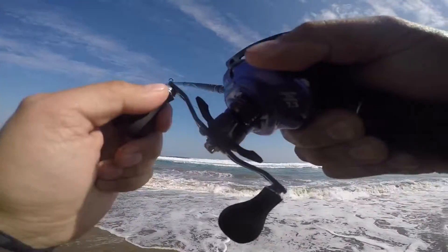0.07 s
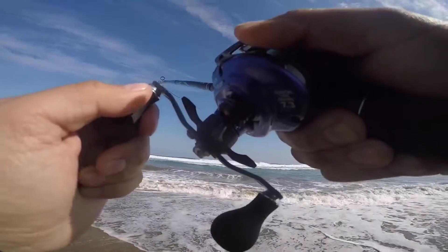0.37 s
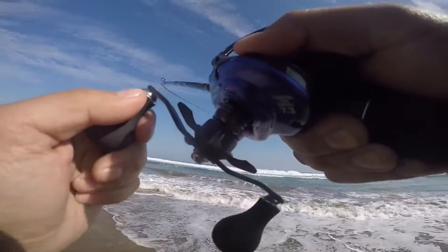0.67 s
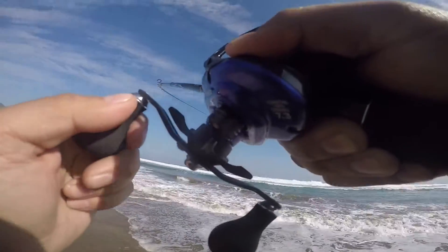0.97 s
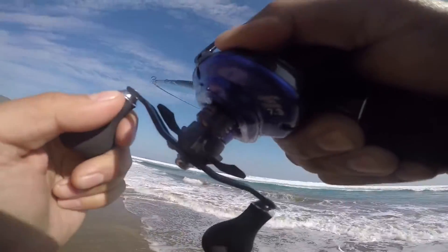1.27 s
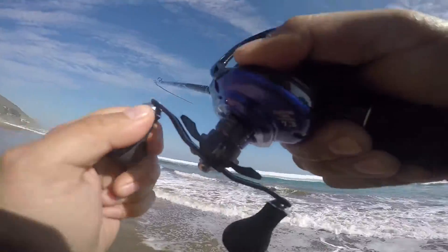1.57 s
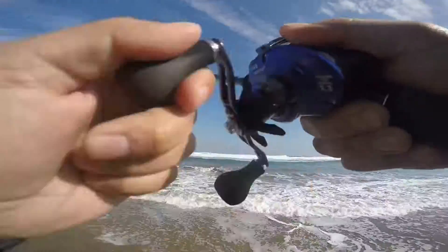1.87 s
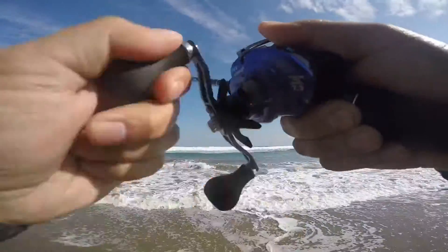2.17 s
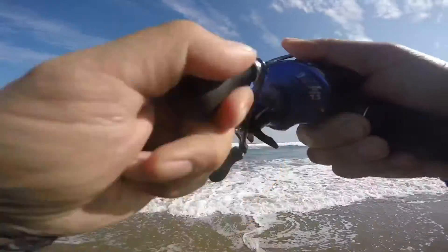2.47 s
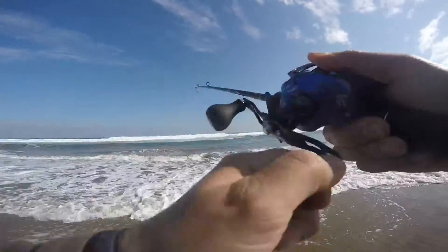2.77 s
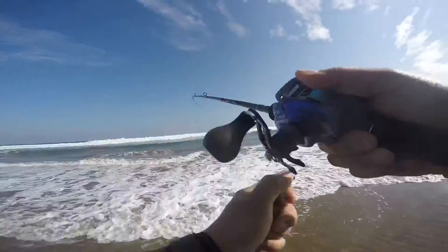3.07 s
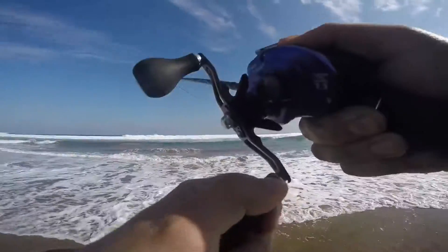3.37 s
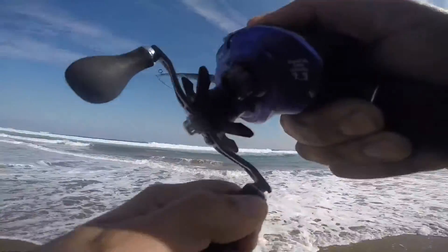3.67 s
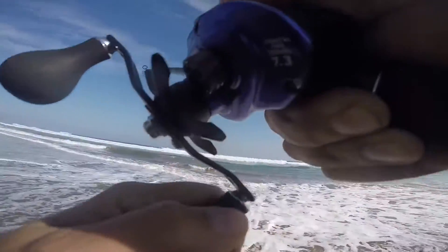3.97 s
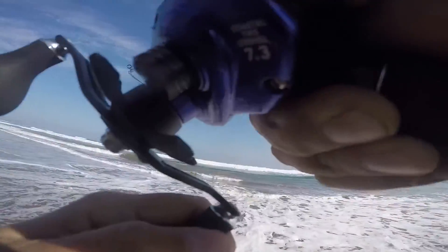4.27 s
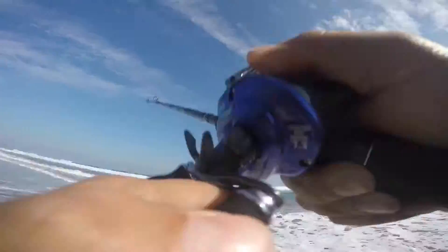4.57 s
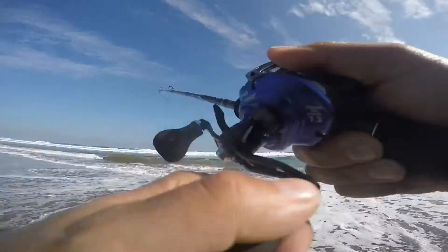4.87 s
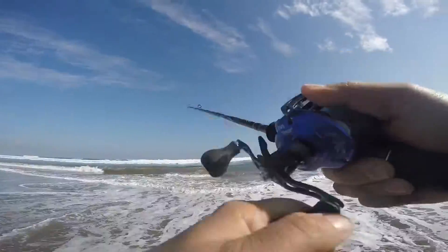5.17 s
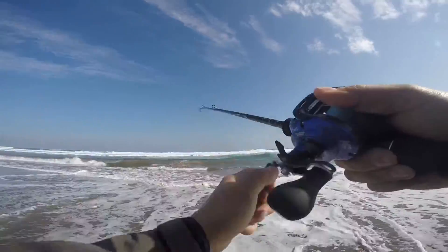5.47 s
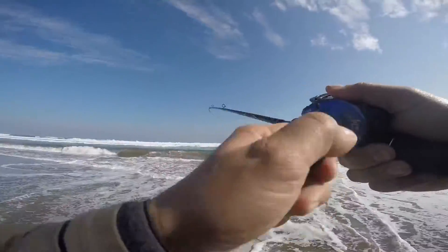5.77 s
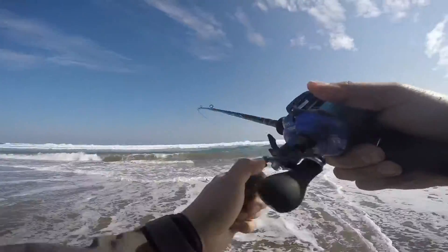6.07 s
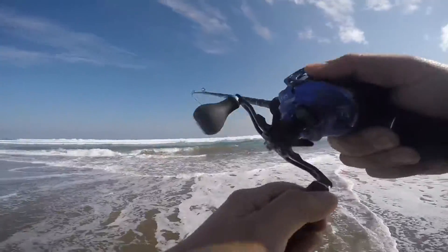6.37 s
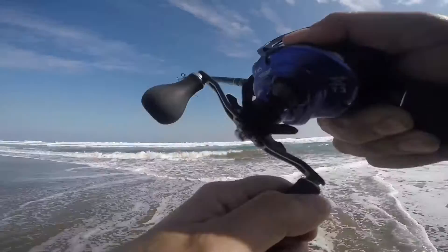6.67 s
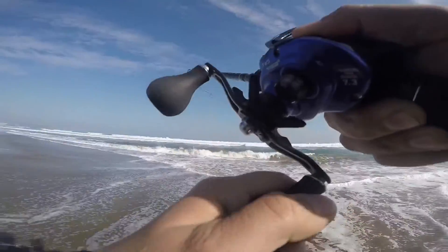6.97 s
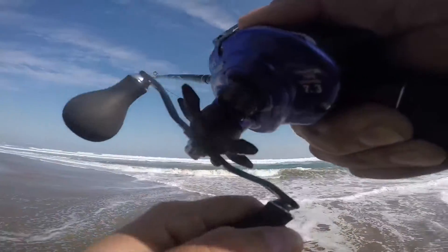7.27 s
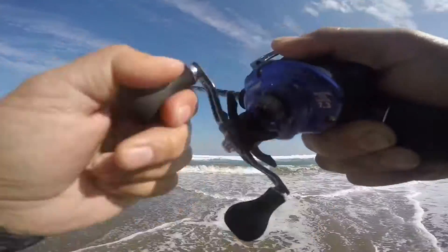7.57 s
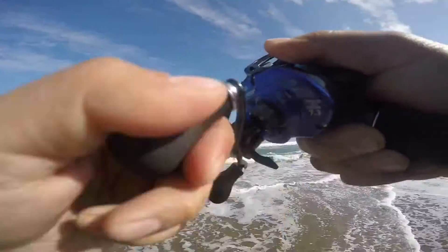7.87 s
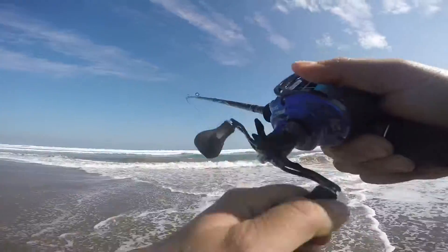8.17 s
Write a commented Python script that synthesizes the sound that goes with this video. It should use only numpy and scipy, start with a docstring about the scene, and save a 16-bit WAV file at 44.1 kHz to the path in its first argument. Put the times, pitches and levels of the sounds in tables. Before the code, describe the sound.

Surf washes over a sandy beach with wind rumbling on the microphone, and a fishing reel snaps into gear with one loud click.

```python
"""A sandy beach: surf washes in while an angler works a fishing reel just in front of a body-worn camera.
Gusts and soft bumps, probably footsteps, rumble in the camera case; something like a sleeve rubs and
ticks against it. Midway the reel snaps into gear: clutch and gears click, and a jolt runs down the rod.
The jolt overloads the microphone, and the limiter ducks the surf for a moment."""
import sys
import numpy as np
from scipy import signal
from scipy.fft import rfft, irfft
from scipy.io import wavfile
from scipy.ndimage import uniform_filter1d, minimum_filter1d

SR = 44100
rng = np.random.default_rng(int(sys.argv[2]) if len(sys.argv) > 2 else 0)


def digitize_waveform(pressure):
    """Quantize a signal to 16-bit integers and store it at the path in sys.argv[1].

    Rows of a 2-D input are taken as channels; values are limited to [-1, 1].
    """
    field = np.atleast_2d(pressure).T
    bounded = np.clip(field, -1, 1)
    quanta = np.round(bounded * 32767).astype(np.int16)
    wavfile.write(sys.argv[1], SR, quanta)


N = 362502
TIME = np.arange(N) / SR


def amp(db):
    """Decibels to gain."""
    return 10 ** (np.asarray(db) / 20)


def unit_rms(x):
    """Scales to rms 1."""
    return x / np.sqrt(np.mean(x ** 2) + 1e-20)


def drift(count, span):
    """Noise averaged over span points, rms 1."""
    return unit_rms(uniform_filter1d(rng.standard_normal(count), size=span))


def spectrum_db(spectrum, hz):
    """Interpolates a spectrum over log frequency."""
    f, db = np.transpose(spectrum)
    return np.interp(np.log(hz + 1), np.log(f), db)


def shaped(x, spectrum):
    """Filters by a spectrum, rms 1."""
    gain = amp(spectrum_db(spectrum, np.fft.rfftfreq(len(x), 1 / SR)))
    return unit_rms(irfft(rfft(x) * gain, len(x)))


def band(x, centre_hz, spread_oct):
    """Broad band-pass, rms 1."""
    octaves = np.log2((np.fft.rfftfreq(len(x), 1 / SR) + 1) / centre_hz)
    return unit_rms(irfft(rfft(x) / (1 + (octaves / spread_oct) ** 2), len(x)))


def low_pass(x, hz):
    """Steep band limit."""
    return signal.oaconvolve(x, signal.firwin(401, hz, window="blackman", fs=SR), "same")


def swell(peak_s, rise_s, fall_s):
    """Two-sided Gaussian hump, height 1."""
    return np.exp(-((TIME - peak_s) / np.where(TIME < peak_s, rise_s, fall_s)) ** 2)


def ring(modes, rise_s):
    """Modes that build up after a blow, then decay."""
    t = np.arange(SR // 3) / SR
    onset = (1 - np.exp(-t / rise_s)) ** 2
    return onset * sum(amp(db) * np.sin(2 * np.pi * hz * t) * 1000 ** (-t / t60) for hz, db, t60 in modes)


def snap(spectrum):
    """Minimum-phase click with this spectrum, peak 1."""
    log_gain = np.log(amp(spectrum_db(spectrum, abs(np.fft.fftfreq(SR // 3, 1 / SR)))))
    click = np.fft.ifft(np.exp(np.conj(signal.hilbert(log_gain)))).real
    return click / abs(click).max()


def add(mix, at_s, sound):
    """Mixes a sound in at at_s."""
    part = mix[max(round(at_s * SR), 0):][:len(sound)]
    part += sound[:len(part)]


def blows(rows, sound):
    """Plays one sound at each row's time and peak level."""
    out = np.zeros(N)
    for at_s, db in rows:
        add(out, at_s, amp(db) * sound / abs(sound).max())
    return out


# Case resonances for airborne sound: f/Hz, width/Hz, boost/dB
CASE_PEAKS = [(1092, 180, 3.5), (1760, 150, 5), (2550, 440, 2), (4043, 350, 8.5), (4970, 370, 5.5),
              (5930, 310, 6.5), (6900, 840, 4), (8330, 380, 3.5), (10380, 680, 4)]

def wash(spectrum, patchy_db, flicker_db):
    """Water noise with drifting patches and splashy flicker, heard through the case."""
    frames, hz = N // 256 + 5, np.fft.rfftfreq(1024, 1 / SR)
    real, imag, patches = rng.standard_normal((3, frames, len(hz)))
    patches = unit_rms(uniform_filter1d(uniform_filter1d(patches, size=14, axis=0), size=16, axis=1))
    flicker = drift(frames, 4)[:, None]
    case_db = sum(db / (1 + (2 * (hz - f) / width) ** 2) for f, width, db in CASE_PEAKS)
    gain = amp(spectrum_db(spectrum, hz) + case_db + patchy_db * patches + flicker_db * flicker)
    bins = (real + 1j * imag) * gain
    return unit_rms(signal.istft(bins.T, nperseg=1024, noverlap=768)[1][:N])


# Breaker and foam spectra: f/Hz, level/dB
ROAR_SPECTRUM = [(60, 0), (130, 0.5), (200, 0.5), (330, 0.5), (520, -3), (700, -8.5), (1000, -8),
                 (1500, -11), (2600, -10), (4200, -19), (5000, -36)]
FOAM_SPECTRUM = [(300, -22), (1000, 4.5), (1500, -0.5), (2000, -11), (3200, -3.5), (3650, -13), (4300, -13),
                 (4600, -12.5), (5500, -15.5), (7500, -14.5), (9200, -20), (11000, -21), (12500, -25),
                 (15000, -28)]
# Waves running up the sand: crest t/s, rise/s, fall/s, roar level/dB, foam level/dB
WAVE_SWELLS = [(.8, 1.8, 0.6, -53, -51.5), (2.45, 1.04, 0.59, -47, -49), (5.5, 0.21, 0.39, -50, -51),
               (6.35, 0.27, 0.55, -45, -50.5), (7.55, .6, 1.5, -44.5, -56)]

def surf(roar_floor_db=-47.5, foam_floor_db=-52.5, cutoff_hz=15300):
    """Each wave swells the roar of the breakers and the fizz of the foam."""
    roar_power, foam_power = amp(roar_floor_db) ** 2, amp(foam_floor_db) ** 2
    for crest_s, rise_s, fall_s, roar_db, foam_db in WAVE_SWELLS:
        wave = swell(crest_s, rise_s, fall_s)
        roar_power += amp(roar_db) ** 2 * wave
        foam_power += amp(foam_db) ** 2 * wave
    roar = np.sqrt(roar_power) * wash(ROAR_SPECTRUM, patchy_db=1.44, flicker_db=0.38)
    fizz = np.sqrt(foam_power) * wash(FOAM_SPECTRUM, patchy_db=0.9, flicker_db=1.3)
    return low_pass(roar + fizz, cutoff_hz)


# Wind rumble: f/Hz, level/dB
WIND_SPECTRUM = [(8, 1), (22, 3.5), (40, 0), (65, -2), (85, -6), (110, -19), (150, -20.5), (300, -43),
                 (700, -86)]
# Gusts: peak t/s, half-length/s, level/dB
WIND_GUSTS = [(1.89, 0.18, -26), (2.643, 0.47, -30), (3.11, 0.18, -31.5), (3.794, 0.031, -36.5),
              (4.5, 0.53, -36.5), (5.306, 0.23, -32), (5.757, 0.075, -30.5), (6.196, 0.1, -22.5),
              (6.677, 0.17, -30), (6.9, 0.083, -30), (7.276, .1, -29), (7.673, 0.057, -27),
              (8.02, 0.17, -27.5)]

def wind(breeze_db=-42, lumpy_db=2.5):
    """Eddies press on the case in uneven lumps; gusts ride on a steady breeze."""
    gust_power = sum(amp(db) ** 2 * swell(peak_s, half_s, half_s) for peak_s, half_s, db in WIND_GUSTS)
    strength = np.sqrt(amp(breeze_db) ** 2 + gust_power)
    lumps = amp(lumpy_db * drift(N, 3000))
    return strength * shaped(rng.standard_normal(N) * lumps, WIND_SPECTRUM)


# Camera mount modes: f/Hz, level/dB, t60/s
MOUNT_MODES = [(59.8, 7, 0.073), (28.4, -9, 0.18)]
# Bumps: t/s, level/dB
BUMP_HITS = [(.2, -16.5), (.57, -19), (.938, -22), (1.31, -21), (1.705, -17), (2.068, -17), (2.385, -17.5),
             (3.28, -15.5), (3.54, -22.5), (3.9, -22), (4.28, -24), (5.415, -21), (6.225, -33), (6.5, -23),
             (7.83, -16.5)]

def bumps():
    """Soft bumps, probably footsteps, sway the camera on its mount."""
    return blows(BUMP_HITS, ring(MOUNT_MODES, rise_s=0.061))


# Camera case modes: f/Hz, level/dB, t60/s
CASE_MODES = [(468, 2, 0.015), (1046, 6.5, 0.014), (1140, -5, 0.02), (1762, -1, .016), (1959, 1, 0.015),
              (2350, -5, 0.017), (3206, -0.5, 0.01), (4280, -2.5, 0.011)]
# Cloth strokes: middle t/s, half-length/s, level/dB, centre f/Hz
CLOTH_STROKES = [(1.449, 0.032, -39, 1250), (1.514, 0.057, -39.5, 1350), (1.982, 0.044, -38.5, 1300),
                 (2.231, 0.078, -36, 1060), (2.904, 0.17, -37.5, 1600), (3.194, 0.041, -41, 1300),
                 (3.737, 0.029, -42, 1510), (3.959, 0.11, -40.5, 1300), (4.041, 0.11, -36.5, 1850),
                 (4.136, 0.058, -39, 1380), (4.352, 0.37, -44, 1190), (5.37, 0.054, -43, 1100),
                 (6.171, 0.056, -36, 1070), (6.233, 0.12, -39.5, 2590), (6.341, 0.078, -38, 2060),
                 (6.778, 0.093, -46.5, 1840), (7.001, 0.11, -42, 1410), (7.355, 0.24, -39, 1540),
                 (7.436, 0.085, -39.5, 1170), (7.943, 0.057, -39, 1270)]

def rubbing(grain_db=3, uneven_db=1.5, spread_oct=1.0):
    """Tiny slips of cloth ring the case; each stroke hisses around its own pitch."""
    slips = rng.standard_normal(N) * amp(grain_db * np.minimum(rng.exponential(1, N), 5))
    catch = amp(uneven_db * drift(N, 700))
    rasp = signal.oaconvolve(slips * catch, ring(CASE_MODES, rise_s=0.00014))
    out = np.zeros(N)
    for middle_s, half_s, db, centre_hz in CLOTH_STROKES:
        start_s = middle_s - half_s
        stroke = np.hanning(int(2 * half_s * SR)) ** 2
        hiss = band(rasp[int(start_s * SR):][:len(stroke)], centre_hz, spread_oct)
        add(out, start_s, amp(db) * stroke * hiss)
    return out


# Case ticks: t/s, level/dB
TICK_HITS = [(2.7868, -17), (5.1975, -17), (5.7095, -17)]

def ticks(cutoff_hz=2600, decay_s=0.0061):
    """The plastic case ticks bluntly in its mount, which damps it quickly."""
    tick = signal.lfilter(*signal.butter(2, cutoff_hz, fs=SR), ring(CASE_MODES, rise_s=0.0018))
    damping = np.exp(-np.arange(len(tick)) / SR / decay_s)
    return blows(TICK_HITS, tick * damping)


# Crack of a click: f/Hz, level/dB
CRACK_SPECTRUM = [(200, -22), (500, 8), (800, 9.5), (1300, 2.5), (1700, 6), (2100, 2.5), (2700, -8.5),
                  (3300, 10), (4400, -9), (6300, -5), (8500, -9), (15000, -22)]
# Reel metal modes: f/Hz, level/dB, t60/s
REEL_MODES = [(2160, -30, 0.088), (3220, -43, 0.074)]
# Clutch and gear clicks: t/s, level/dB, high-pass f/Hz, low-pass f/Hz
REEL_CLICKS = [(4.579, -25, 300, 6000), (4.5856, 10.5, 200, 6060), (4.5868, 14, 200, 5400),
               (4.591, -2, 600, 4030), (4.597, -11.5, 1000, 6100), (4.638, -24, 1500, 3500),
               (4.657, -10, 1500, 4000), (4.7965, -16, 2500, 4500)]

def reel(crack_db=-2, rattle_s=0.0024, rattle_db=-16):
    """Each click is a short crack, a brief gear rattle and a faint metal ring."""
    out, metal = np.zeros(N), ring(REEL_MODES, rise_s=0.00018)
    t = np.arange(len(metal)) / SR
    crack = amp(crack_db) * snap(CRACK_SPECTRUM)
    for at_s, db, bass_hz, treble_hz in REEL_CLICKS:
        noise = shaped(rng.standard_normal(len(t)), CRACK_SPECTRUM)
        rattle = amp(rattle_db) * np.exp(-t / rattle_s) * noise
        click = signal.lfilter(*signal.butter(2, treble_hz, fs=SR), crack + rattle + metal)
        click = signal.lfilter(*signal.butter(2, bass_hz, "high", fs=SR), click)
        add(out, at_s, amp(db) * click)
    return out


# Clutch jolts: t/s, level/dB, settled f/Hz, t60/s
CLUTCH_JOLTS = [(4.5795, 18.5, 68.3, 0.094), (4.655, -11, 280, 0.045), (4.657, -10, 68.4, .12)]

def jolts(sweep_hz=690, settle_s=0.00168, rise_s=0.018):
    """A bending wave runs down the rod, high frequencies first, and settles into a low boom."""
    out, t = np.zeros(N), np.arange(SR // 3) / SR
    for at_s, db, hz, t60 in CLUTCH_JOLTS:
        cycles = np.cumsum(hz + sweep_hz * np.exp(-t / settle_s)) / SR
        envelope = (1 - np.exp(-t / rise_s)) * 1000 ** (-t / t60)
        add(out, at_s, amp(db) * envelope * np.sin(2 * np.pi * cycles))
    return out


def scene():
    """All sources at one microphone."""
    return (surf() + wind() + bumps() + rubbing() + ticks() + reel() + jolts())[None]


def record(dry, threshold_db=-3.5, hold_s=0.4, recovery_db_per_s=25, attack_s=0.008, cutoff_hz=16500):
    """Limiter with hold and recovery, soft clipping of peaks that outrun it, then a band limit."""
    level = uniform_filter1d(abs(dry[0]), size=300)
    over_db = np.maximum(20 * np.log10(abs(level) + 1e-9) - threshold_db, 0)
    half_hold = int(hold_s * SR) // 2
    held_db = -minimum_filter1d(-over_db, 2 * half_hold + 1, origin=half_hold)
    ramp_db = recovery_db_per_s * TIME
    cut_db = np.maximum.accumulate(held_db + ramp_db) - ramp_db
    pole = np.exp(-1 / (attack_s * SR))
    ducked = dry[0] / amp(signal.lfilter([1 - pole], [1, -pole], cut_db))
    clipped = ducked / (1 + ducked ** 4) ** (1 / 4)
    return low_pass(clipped, cutoff_hz)[None]


dry = scene()
out = record(dry)
digitize_waveform(out)
```